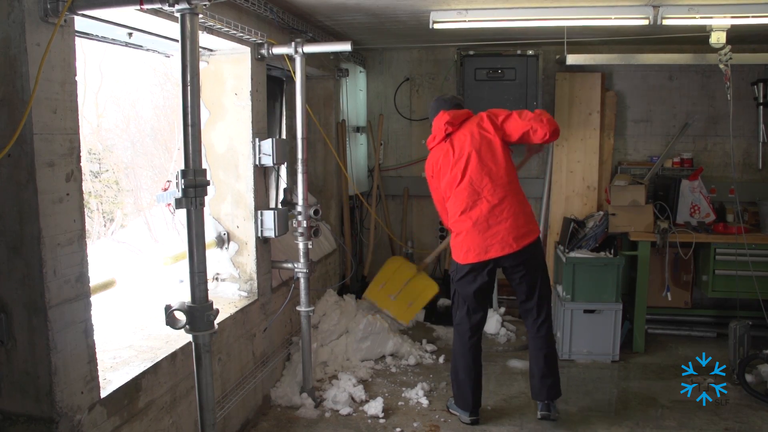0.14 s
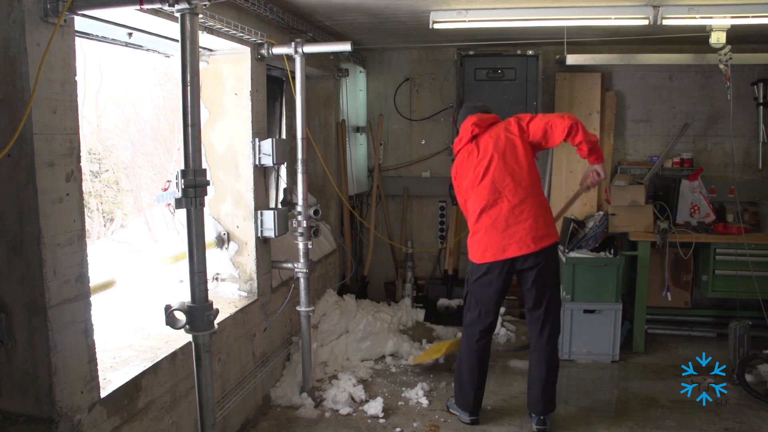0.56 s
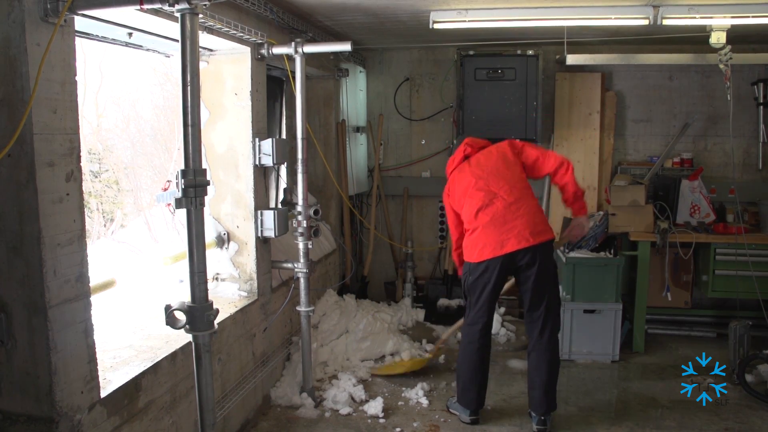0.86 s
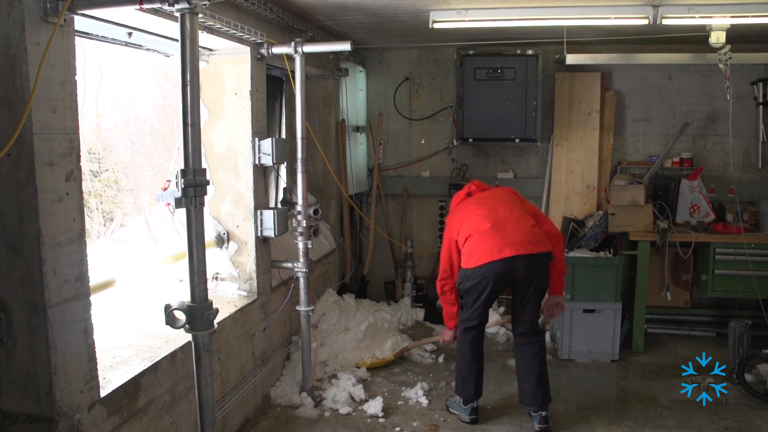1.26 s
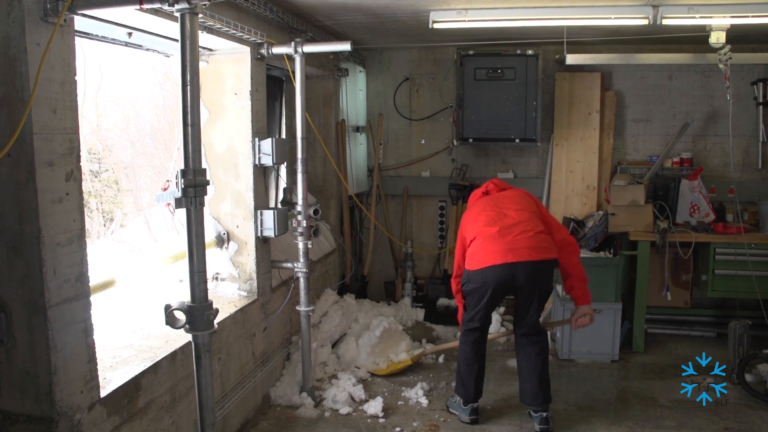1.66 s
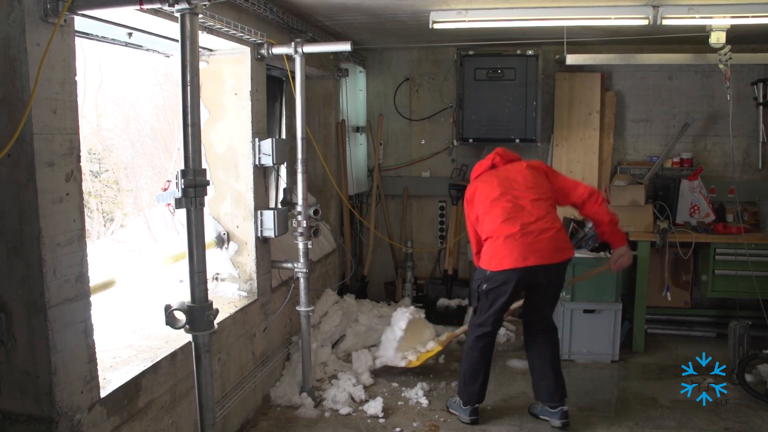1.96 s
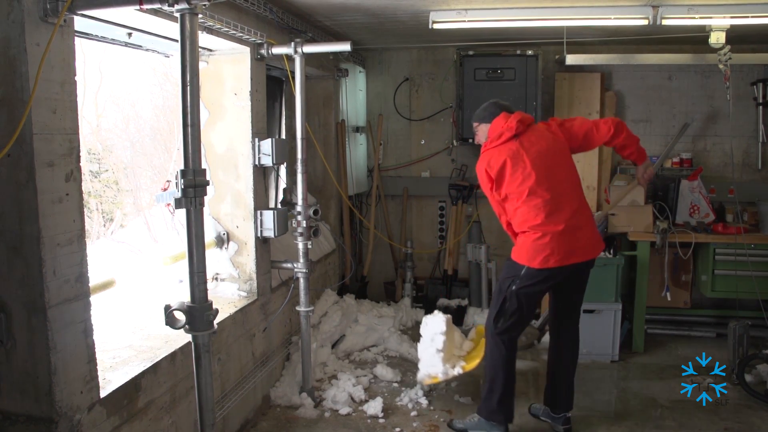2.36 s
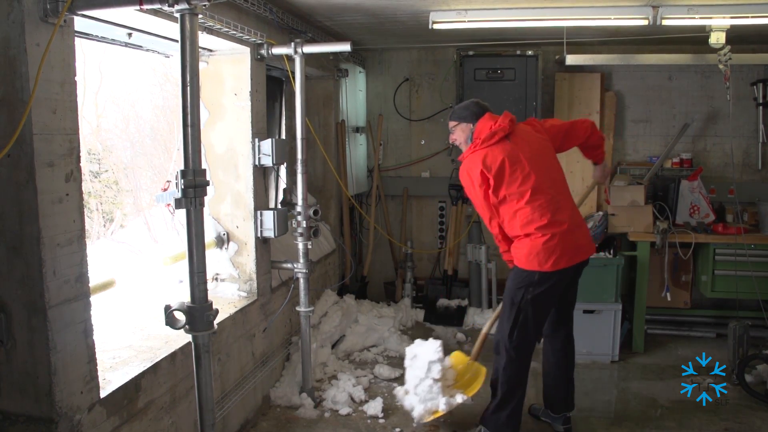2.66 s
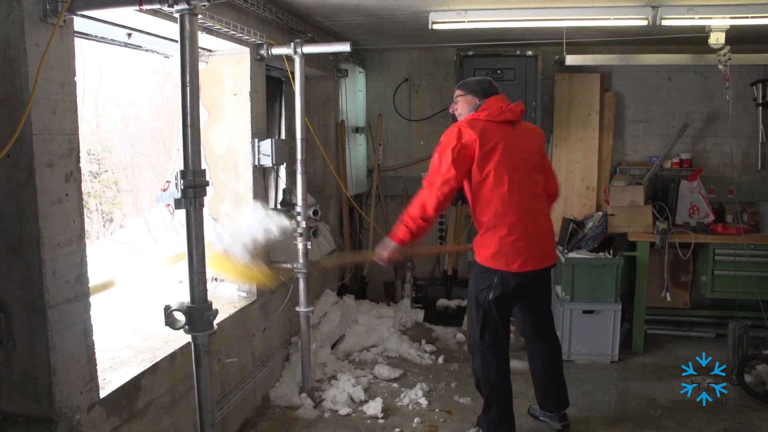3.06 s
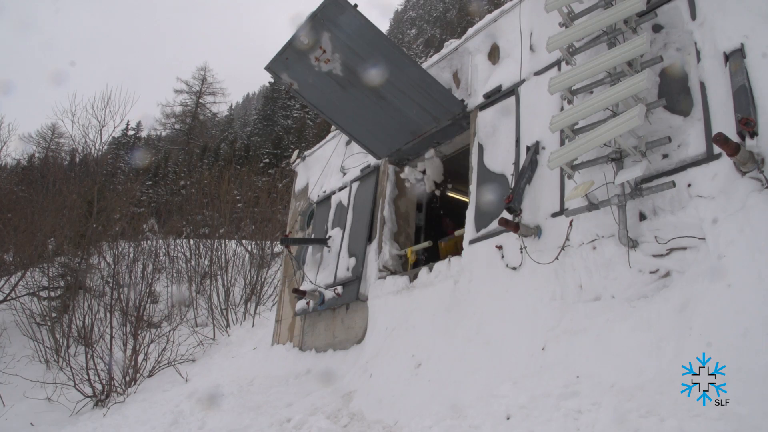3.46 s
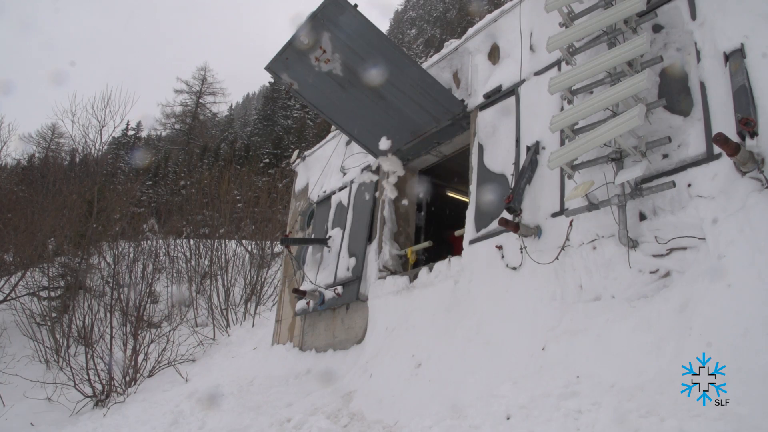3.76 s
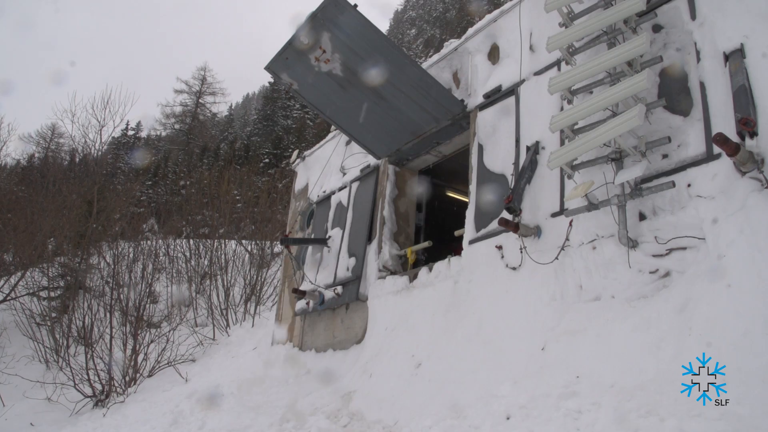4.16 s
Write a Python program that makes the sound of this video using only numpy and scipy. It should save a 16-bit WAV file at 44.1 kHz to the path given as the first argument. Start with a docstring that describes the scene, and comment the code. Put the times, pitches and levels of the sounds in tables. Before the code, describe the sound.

A plastic shovel scrapes once over gritty concrete into snow, with jacket swishes, light knocks and soft thuds of snow landing.

```python
"""Shovelling snow on concrete

A plastic shovel is shoved once over the floor of a bare concrete room into a heap of snow, lifted
and emptied. Stick-slip friction on grit excites the modes of the scoop. A nylon jacket swishes with
each move, the shovel knocks lightly, and the thrown snow lands in soft thuds over a faint hum."""
import sys
import numpy as np
from scipy import signal
from scipy.fft import rfft, irfft
from scipy.io import wavfile

SR = 44100
rng = np.random.default_rng(int(sys.argv[2]) if len(sys.argv) > 2 else 0)


def log_audio(samples):
    """Write samples as a 16-bit WAV file to the path given in sys.argv[1]."""
    # one column per channel
    frames = np.atleast_2d(samples).T
    # limit to full scale, then quantise
    limited = np.clip(frames, -1, 1)
    pcm = np.round(limited * 32767).astype(np.int16)
    wavfile.write(sys.argv[1], SR, pcm)


N = 190413
TIME = np.arange(N) / SR

# the edge catches on the concrete: start_s, relative_db
EDGE_CATCHES = [(0.8095, -40), (0.831, -15), (0.845, -12), (0.8554, -13.5), (0.871, -14.5), (0.93, -7.5),
                (0.933, -15.5), (0.9411, -18), (0.9611, -13), (.977, -15.5), (1.017, -30), (1.0234, -12),
                (1.0581, -29), (1.079, -16)]
# the edge bites harder: peak_s, length_s, added_force_db
EDGE_BITES = [(0.815, 0.021, -24), (0.865, 0.074, -19), (0.93, 0.052, -18), (0.964, 0.026, -28.5),
              (1.018, 0.061, -19), (1.062, 0.036, -18), (1.151, 0.05, -41)]
# the surface under the edge, from concrete into snow: time_s, grit_db, scoop_db, sharpness_db
SURFACE = [(.805, 5.5, 3, 4), (.85, 1.5, -2, 2), (.875, 0.5, -5.5, 7), (.93, 5.5, -3, -6),
           (.968, -2.5, 2.5, 0), (1.0, 5, 0.5, -3.5), (1.078, -7, -11, -2), (1.15, 13.5, -15, -1.5)]
# modes of the scoop: pitch_hz, t60_s, relative_db
SCOOP_MODES = [(376, .2, -17), (437.7, .33, 1), (463.5, .3, 1), (513.3, .3, -1), (549.4, .33, 1),
               (655, .28, -1), (673, .25, -7), (705, .25, -8), (767, .28, 0), (867.5, .25, -7),
               (968, .2, -7), (1035.6, .2, 1), (1102, .22, -11), (1480, .1, -5), (1612, .2, -7),
               (2043, .12, -8), (2430, .14, -9), (3230, .12, -11)]
# knocks of shaft, blade and snow: start_s, relative_db, t60_s, centre_hz, half_width_octaves, ring_db
LIGHT_KNOCKS = [(0.05, -37.5, 0.077, 2795, 0.064, -35), (0.062, -39, 0.059, 1890, 0.054, -4),
                (0.101, -40, 0.12, 1100, 0.059, -13), (0.316, -39.5, 0.026, 3670, 0.51, -30),
                (0.4613, -44, 0.027, 2930, 0.4, -26), (0.462, -52, 0.014, 9000, 0.54, -32),
                (1.408, -54, 0.028, 680, 2, -8), (1.476, -52, 0.059, 1500, 1.45, -11),
                (1.888, -50, 0.036, 800, 0.77, -30), (2.1191, -39, 0.075, 3600, 1.23, -16.5),
                (2.13, -39, 0.016, 1430, 1.5, -26), (2.138, -46, 0.12, 4900, 0.56, -28),
                (2.29, -59, .08, 5000, 1.2, -25.5), (2.548, -51, 0.027, 1190, 0.23, -13),
                (2.589, -57, 0.11, 2530, 1.16, -30), (2.72, -58, 0.1, 2000, 1.46, -12),
                (3.081, -53, 0.057, 1400, 1.3, -14), (3.359, -43.5, 0.075, 1170, 0.51, -26),
                (3.384, -46.5, 0.12, 784, 0.084, -31.5), (3.549, -53.5, 0.11, 2220, 0.66, -18),
                (3.678, -56, 0.038, 1460, 1.2, -28), (3.716, -53, 0.026, 2900, 0.82, -20),
                (3.799, -57, 0.018, 10000, .6, -29), (3.829, -47.5, 0.069, 554, 0.51, -20),
                (3.888, -51.5, 0.21, 940, 0.11, -14), (3.933, -52.5, 0.098, 1270, 0.42, -15)]
# the arms swing: peak_s, length_s, swish_db, flap_db
ARM_SWINGS = [(0.06, 0.23, -38, -41.5), (0.321, 0.084, -44.5, -54.5), (1.573, 0.33, -58.5, -56.5),
              (1.75, 0.6, -64, -72), (2.105, 0.29, -56, -69), (2.304, 0.056, -57.5, -61),
              (2.5, 0.86, -69, -67), (2.95, 0.51, -61.5, -57.5), (3.162, 0.23, -53.5, -61),
              (3.274, 0.15, -43, -46.5), (3.376, 0.14, -51, -65), (3.527, 0.47, -70, -64.5),
              (3.68, 0.067, -72, -52.5), (3.914, 0.9, -56.5, -56), (4.094, 0.11, -54, -60)]
# the body holds still before the throw: centre_s, length_s, dip_db
STILLNESS = (2.63, 0.2, -23)
# a fine, bright hiss swells with the jacket's movements: peak_s, length_s, level_db
FINE_HISSES = [(.06, .15, -46), (.33, 0.093, -51), (.52, 0.29, -70), (2.15, 0.23, -57), (2.32, 0.11, -65),
               (2.925, 0.26, -52), (3.285, .17, -46.5), (3.9, 0.38, -55.5), (4.06, 0.22, -58.5),
               (4.29, 0.19, -60.5)]
# lumps of snow land: start_s, level_db
SNOW_THUDS = [(4.181, -51.5), (4.23, -47), (4.262, -55), (4.288, -53)]
# level of the room air: time_s, level_db
AIR_LEVEL = [(0, -56), (1.8, -65.5), (2.5, -61.5), (2.8, -63.5), (3.3, -59), (4.317, -62.5)]
# partials of the hum: pitch_hz, level_db
HUM_PARTIALS = [(91.5, -85.5), (258.4, -87.5), (419.9, -102)]
# a low ring hangs in the room: start_s, pitch_hz, t60_s, level_db
LOW_RING = [(.03, 353, 2.6, -53.5), (.06, 631, 1.0, -46.5), (.05, 684, .6, -52)]
# reverberation time: frequency_hz, t60_s
ROOM_DECAY = [(150, 0.5), (450, 0.68), (1000, 0.56), (3000, 0.47), (7000, 0.5), (15000, 0.28)]
# spectral densities of the noise sources: frequency_hz, relative_db
SLIP_SPECTRUM = [(40, -55), (150, -30), (260, -30), (335, -35), (410, -2.5), (600, 0), (950, 2.5),
                 (1300, -3), (2200, -7.5), (3500, -10.5), (7000, -43), (15000, -59)]
GRIT_SPECTRUM = [(250, -36), (600, -29), (1500, 7), (2800, 2), (4500, 0), (7000, -6), (9500, -12.5),
                 (12000, -22.5), (16000, -35)]
NYLON_SPECTRUM = [(88, -31), (150, -57), (610, -2.5), (1030, -12), (1440, -6.5), (1890, -9.5), (2130, -4),
                  (2740, -1.5), (2960, -2), (8990, -10.5), (15800, -46)]
FOLD_SPECTRUM = [(40, -45), (100, -26.5), (300, -7), (600, -4.5), (950, 0), (1800, -2.5), (3500, -16),
                 (8000, -33)]
HISS_SPECTRUM = [(500, -28), (2000, -4), (5000, 3.5), (8000, 1), (11000, -1.5), (16000, -13)]
THUD_SPECTRUM = [(40, -23), (90, -19), (150, -1.5), (260, -2), (400, 3.5), (800, -3.5), (1500, -12.5),
                 (5000, -34)]
AIR_SPECTRUM = [(25, -42), (60, -61), (85, -8), (115, -26), (150, -11.5), (185, -17.5), (250, -2),
                (305, -9.5), (380, -1), (650, -2.5), (1200, -7.5), (2100, -12.5), (8000, -26), (15800, -46)]

SHOVE_START_S, SHOVE_STOP_S, SHOVE_DB = 0.802, 1.08, -24
SHOVE_ATTACK_S, SHOVE_RELEASE_S = 0.012, 0.0027
RISE_SHARE, SWELL_ENDS_DB, FLANK_POWER = 0.49, -26, 1.44
RUSTLE_DB, RUSTLE_FOLD_DB, STEADY_HISS_DB = -66.5, -64.5, -67
CUTOFF_HZ = 15800


def scrape():
    """Stick-slip friction: the edge jerks and catches, driving the scoop while grit crackles below."""
    grit_db, scoop_db, sharpness_db = curves(SURFACE)
    force = edge_force()
    catches = sum(undb(db + 6.5) * burst(s, t60=0.011) for s, db in EDGE_CATCHES)
    slips = force * grains(per_s=800, spread_db=0.5) + catches
    grit = undb(grit_db) * (force * grains(per_s=2000, spread_db=2) + undb(-6.5) * catches)
    rasp = undb(-8.5) * colour(room(slips, wet_db=-2, spots=4), SLIP_SPECTRUM)
    crackle = undb(-8) * colour(room(grit, wet_db=-3.5, spots=4), GRIT_SPECTRUM)
    # bare concrete sharpens the crackle, snow under the edge muffles it
    dull = signal.sosfilt(signal.butter(1, 4500, fs=SR, output="sos"), crackle)
    crackle = dull + undb(sharpness_db) * (crackle - dull)
    resonance = undb(-2.5) * room(scoop(undb(scoop_db) * slips), wet_db=-15)
    return rasp + crackle + resonance


def edge_force():
    """Superposed forces: a steady push that stops in the heap, plus the brief bites of the edge."""
    attack = np.clip((TIME - SHOVE_START_S) / SHOVE_ATTACK_S, 0, 1)
    release = np.clip(1 - (TIME - SHOVE_STOP_S) / SHOVE_RELEASE_S, 0, 1)
    bites = sum(undb(db) * swell(s, length) for s, length, db in EDGE_BITES)
    return attack * (undb(SHOVE_DB) * release + bites)


def scoop(push):
    """Modal resonance: damped modes ring with the energy of the push; only the band from 350 Hz to 5 kHz
    sounds."""
    t = TIME[:SR // 2]
    ring = 0
    for hz, t60, db in SCOOP_MODES:
        mode = np.cos(2 * np.pi * hz * t) * np.exp(-np.log(1000) * t / t60)
        ring += undb(db) * unit(convolve(push, mode))
    radiated = signal.sosfilt(signal.butter(4, [350, 5000], "bandpass", fs=SR, output="sos"), ring)
    return unit(radiated) * np.std(push)


def knocks():
    """Impact excitation: each blow is a brief band of noise and sets the scoop ringing a little."""
    cracks, push = 0, 0
    hz = np.geomspace(30, 20000, 200)
    for s, db, t60, centre_hz, octaves, ring_db in LIGHT_KNOCKS:
        blow = undb(db + 3) * burst(s, t60)
        band_db = -14 * np.log10(1 + (np.log2(hz / centre_hz) / octaves) ** 4)
        cracks += colour(blow, np.column_stack([hz, band_db]))
        push += undb(ring_db) * blow
    return room(cracks + scoop(push), wet_db=-5)


def jacket():
    """Friction noise: nylon threads tick over each other in a bright swish; folds flap lower down."""
    swish = movements([(s, length, db) for s, length, db, _ in ARM_SWINGS], steady_db=RUSTLE_DB)
    flap = movements([(s, length, db) for s, length, _, db in ARM_SWINGS], steady_db=RUSTLE_FOLD_DB)
    threads = room(swish * grains(per_s=5000, spread_db=3), wet_db=-5, spots=3)
    folds = room(flap * grains(per_s=1000, spread_db=2.5), wet_db=-5.5, spots=2)
    return colour(threads, NYLON_SPECTRUM) + colour(folds, FOLD_SPECTRUM)


def fine_hiss():
    """Modulated shot noise: a fine, bright hiss swells with the jacket's movements."""
    ticks = movements(FINE_HISSES, steady_db=STEADY_HISS_DB) * grains(per_s=5000, spread_db=4)
    return colour(room(ticks, wet_db=-4.5, spots=2), HISS_SPECTRUM)


def thuds():
    """Inelastic impact: soft lumps of snow collapse as they land."""
    lumps = sum(undb(db) * burst(s, t60=0.25) for s, db in SNOW_THUDS)
    return colour(lumps, THUD_SPECTRUM)


def room(x, wet_db, spots=1):
    """Reverberation: dense echoes off concrete, treble dying first, differ for each source spot."""
    t, hz = TIME[:SR], np.fft.rfftfreq(SR, 1 / SR)
    octave = np.log2(np.clip(hz, 125, 16000) / 125)
    bands = np.arange(8)[:, None]
    band_gain = np.maximum(1 - abs(octave - bands), 0)
    t60 = over_hz(ROOM_DECAY, 125 * 2. ** bands)
    envelope = np.exp(-np.log(1000) * t / t60) * np.clip(t / 0.005, 0, 1)
    spot = rng.integers(spots, size=N)
    echoes = 0
    for k in range(spots):
        band_noise = irfft(rfft(rng.standard_normal(SR)) * band_gain, SR)
        echoes += convolve(x * (spot == k), np.sum(envelope * band_noise, axis=0))
    return (x + undb(wet_db) * echoes) / np.hypot(1, undb(wet_db))


def background():
    """Noise floor: broadband room air, a faint steady hum and a low ring that decays exponentially."""
    air = undb(curves(AIR_LEVEL)[0]) * colour(rng.standard_normal(N), AIR_SPECTRUM, size=8192)
    hum = sum(undb(db) * np.sin(2 * np.pi * (hz * TIME + rng.random())) for hz, db in HUM_PARTIALS)
    ring = sum(undb(db) * fade(s, t60) * np.sin(2 * np.pi * hz * (TIME - s))
               for s, hz, t60, db in LOW_RING)
    return air + hum + ring


def movements(rows, steady_db):
    """Incoherent addition: swells sum in power with a steady stir that dips while the body is still."""
    still_s, still_length_s, dip_db = STILLNESS
    stir = undb(steady_db + dip_db * swell(still_s, still_length_s))
    swell_power = sum((undb(db) * swell(s, length)) ** 2 for s, length, db in rows)
    return np.sqrt(stir ** 2 + swell_power)


def swell(peak_s, length_s):
    """Amplitude envelope of one movement: it gathers speed, peaks at 1 and ebbs."""
    age = (TIME - peak_s) / length_s
    from_peak = np.maximum(-age / RISE_SHARE, age / (1 - RISE_SHARE))
    return undb(SWELL_ENDS_DB * np.minimum(from_peak, 10) ** FLANK_POWER)


def grains(per_s, spread_db):
    """Shot noise: clicks of uneven size at random times, rms 1."""
    chance, size = rng.random(N), rng.standard_normal(N)
    clicks = (chance < per_s / SR) * rng.choice([-1, 1], N)
    return unit(clicks * undb(spread_db * np.clip(size, -2, 2)))


def burst(start_s, t60):
    """Random micro-impacts merge into decaying Gaussian noise."""
    return rng.standard_normal(N) * fade(start_s, t60)


def fade(start_s, t60):
    """Exponential decay: a jump to 1, then a fall of 60 dB every t60 seconds."""
    age = TIME - start_s
    return (age >= 0) * np.exp(-np.log(1000) * np.clip(age / t60, 0, 10))


def colour(x, spectrum, size=2048):
    """Minimum-phase filtering: folding the cepstrum of the log gain makes the response causal."""
    gain = undb(over_hz(spectrum, np.fft.rfftfreq(size, 1 / SR)))
    cepstrum = irfft(np.log(gain))
    cepstrum[1:size // 2] *= 2
    cepstrum[size // 2 + 1:] = 0
    return convolve(x, irfft(np.exp(rfft(cepstrum))))


def convolve(x, response):
    """Convolution with an impulse response of unit energy."""
    return signal.fftconvolve(x, response / np.linalg.norm(response))[:N]


def curves(rows):
    """Linear interpolation of each column over time."""
    times, *columns = np.transpose(rows)
    return [np.interp(TIME, times, column) for column in columns]


def over_hz(points, hz):
    """Interpolation on a log-frequency axis."""
    point_hz, values = np.transpose(points)
    return np.interp(np.log(hz + 1e-9), np.log(point_hz), values)


def undb(db):
    """Decibels to amplitude ratio."""
    return 10 ** (np.asarray(db) / 20)


def unit(x):
    """Normalisation to rms 1."""
    return x / np.sqrt(np.mean(x ** 2) + 1e-30)


def scene():
    """Superposition: the pressures of all sources add at one point."""
    return (scrape() + knocks() + jacket() + fine_hiss() + thuds() + background())[None]


def record(dry):
    """Band limiting: a steep low-pass removes the highest treble."""
    return signal.sosfilt(signal.ellip(10, 0.1, 80, CUTOFF_HZ, fs=SR, output="sos"), dry)


dry = scene()
out = record(dry)
log_audio(out)
```